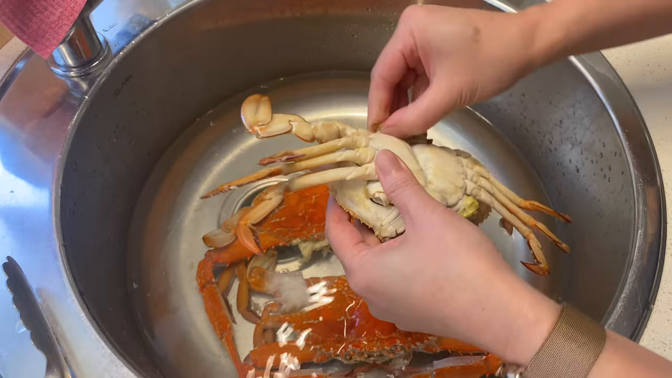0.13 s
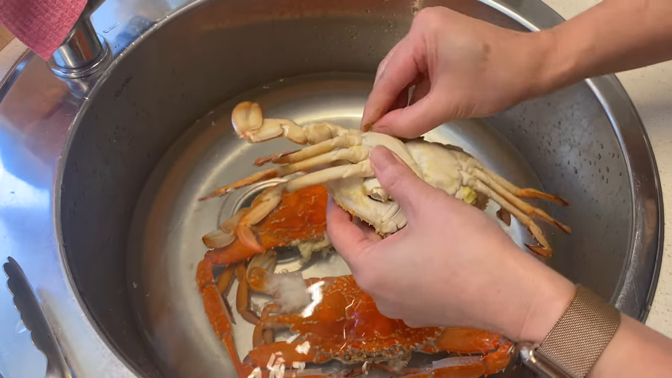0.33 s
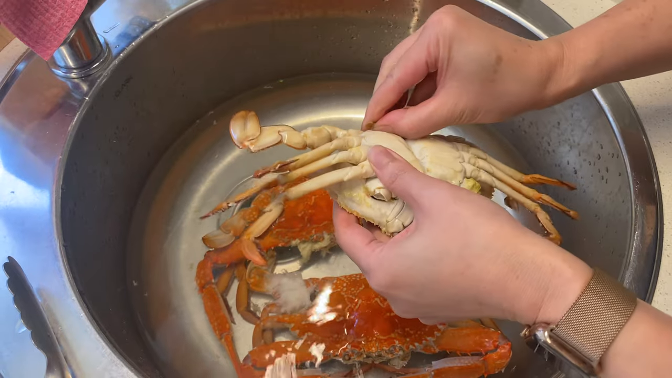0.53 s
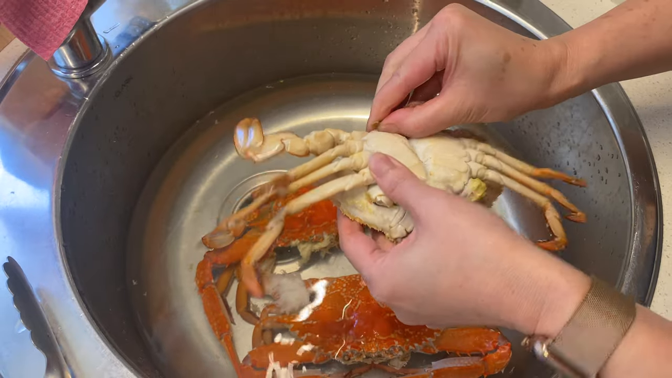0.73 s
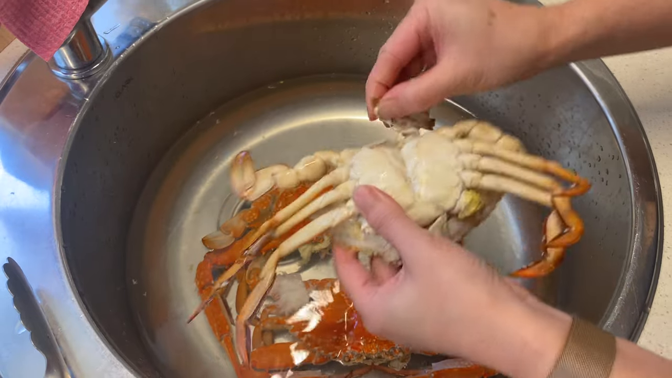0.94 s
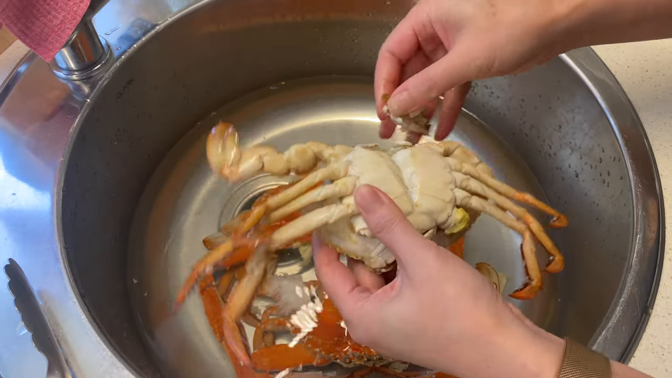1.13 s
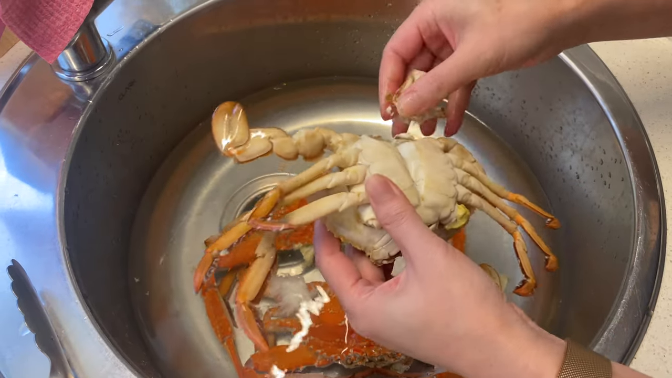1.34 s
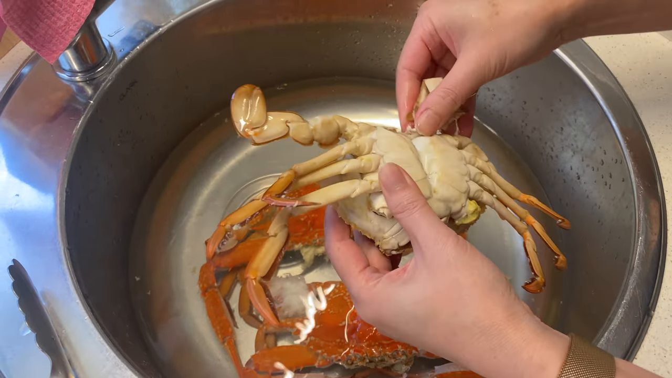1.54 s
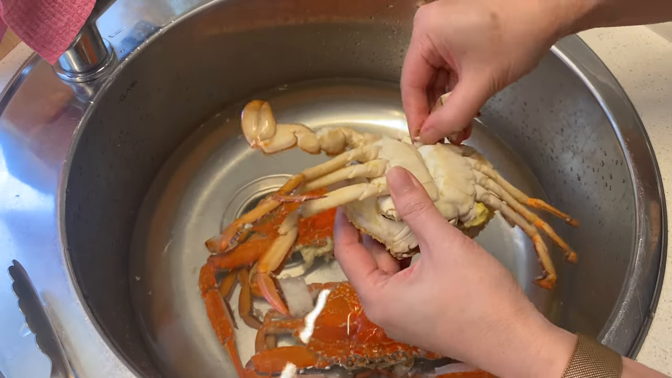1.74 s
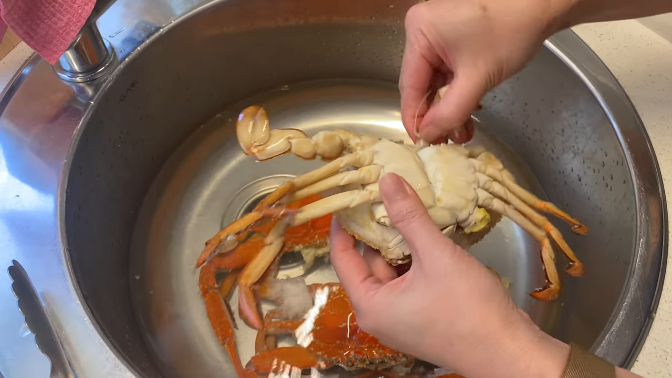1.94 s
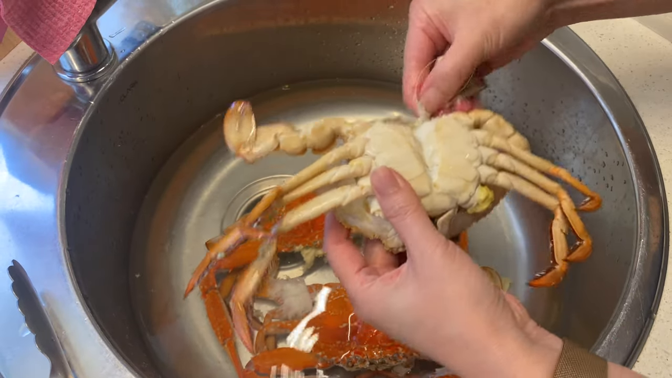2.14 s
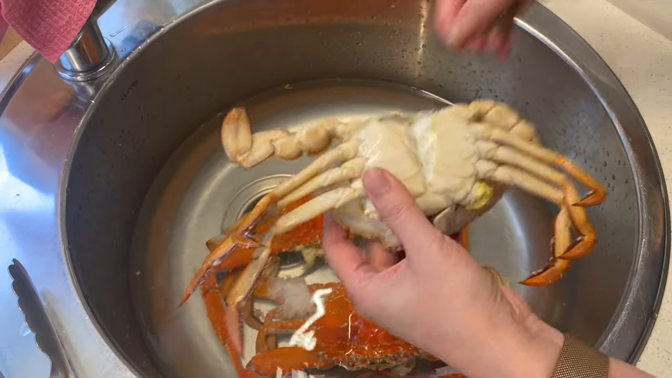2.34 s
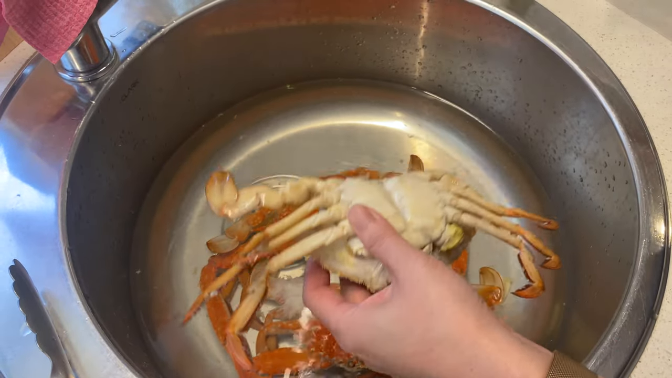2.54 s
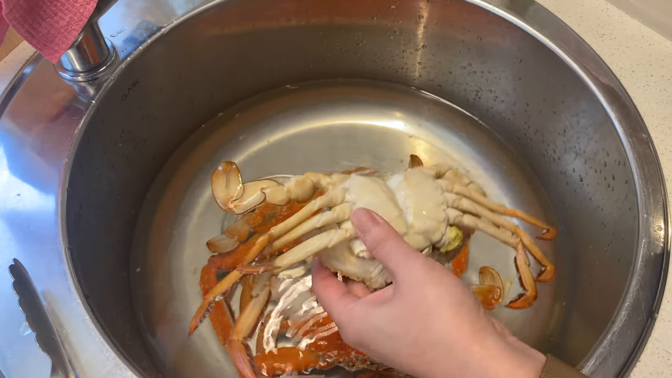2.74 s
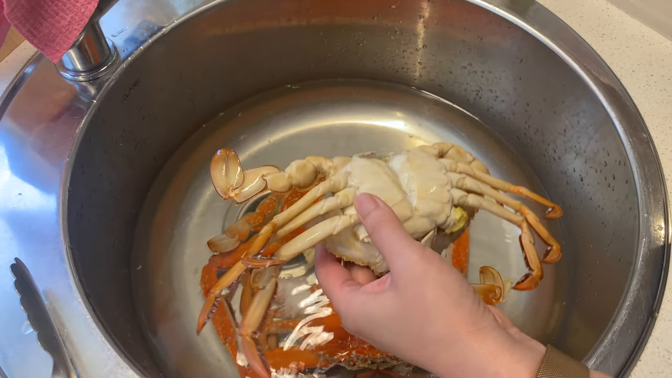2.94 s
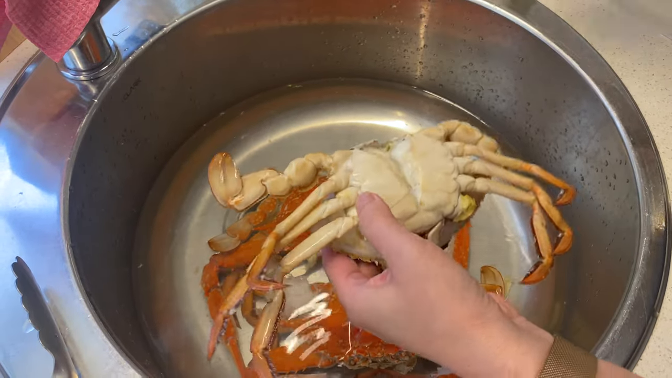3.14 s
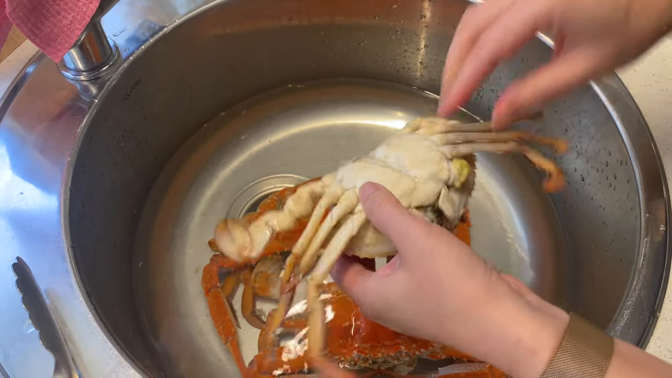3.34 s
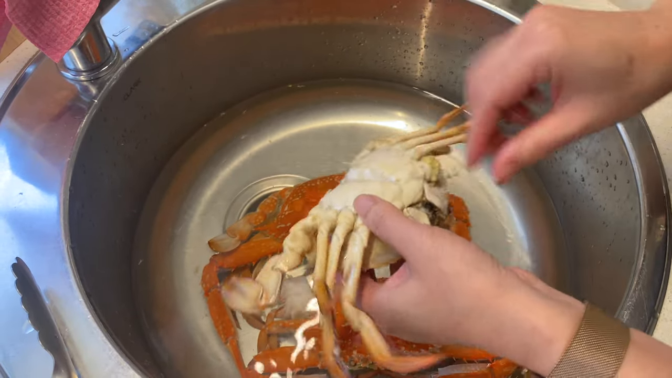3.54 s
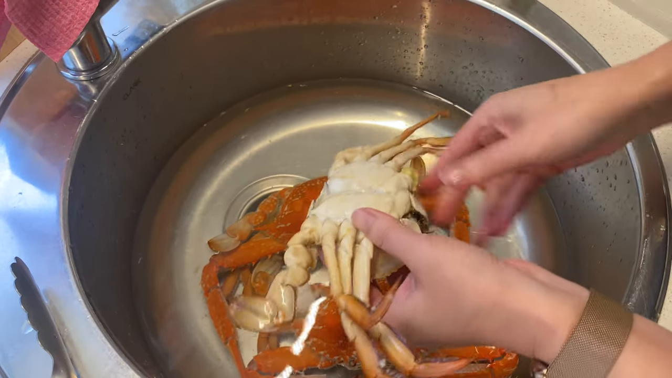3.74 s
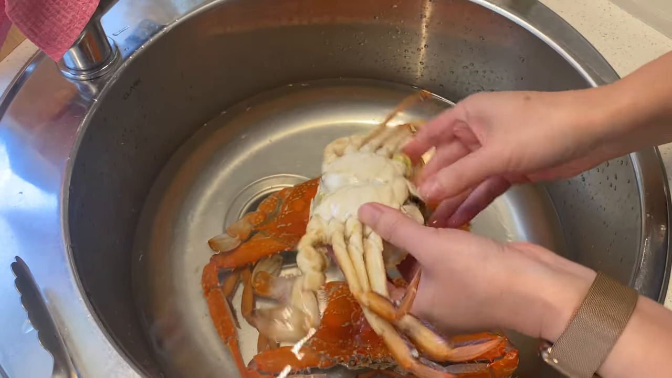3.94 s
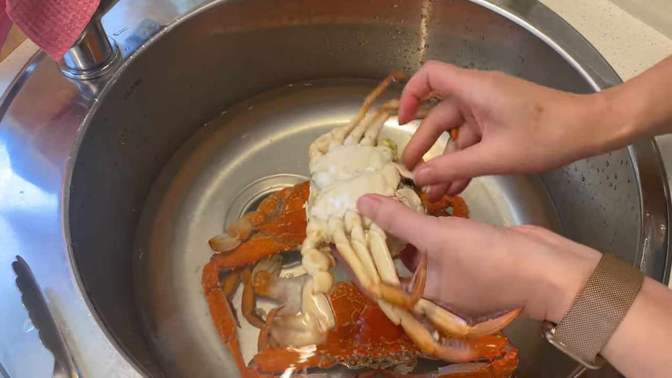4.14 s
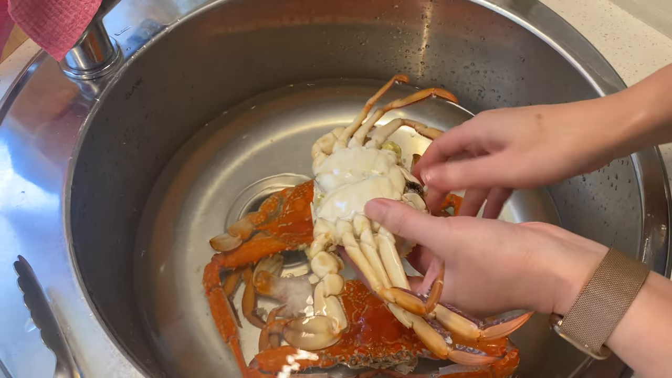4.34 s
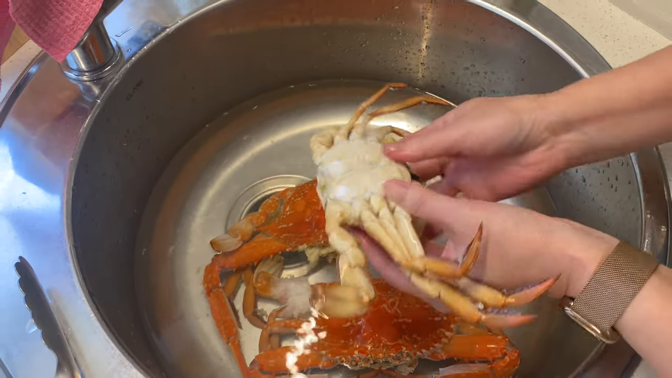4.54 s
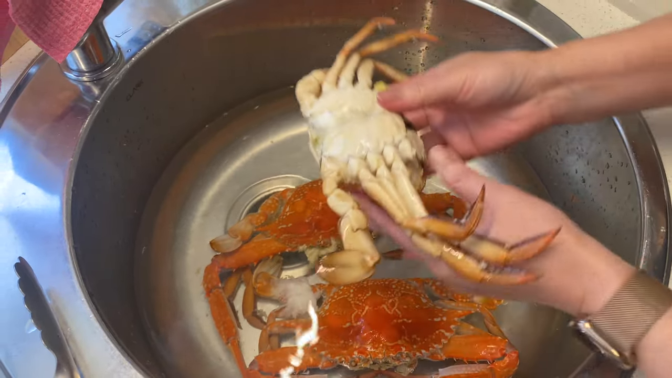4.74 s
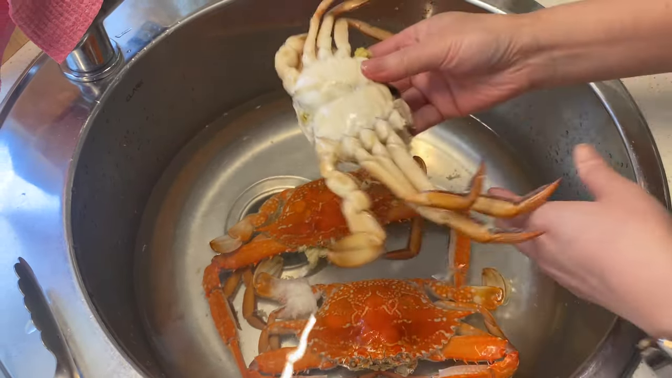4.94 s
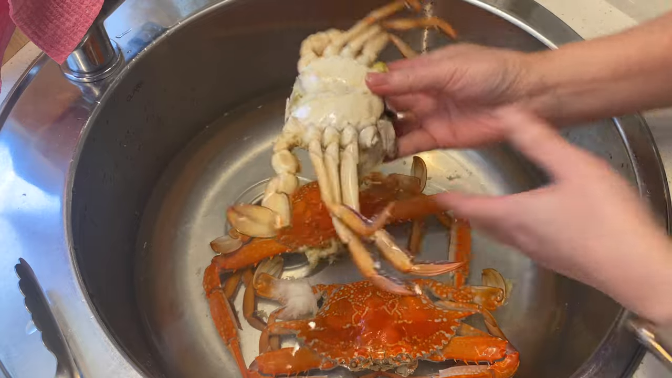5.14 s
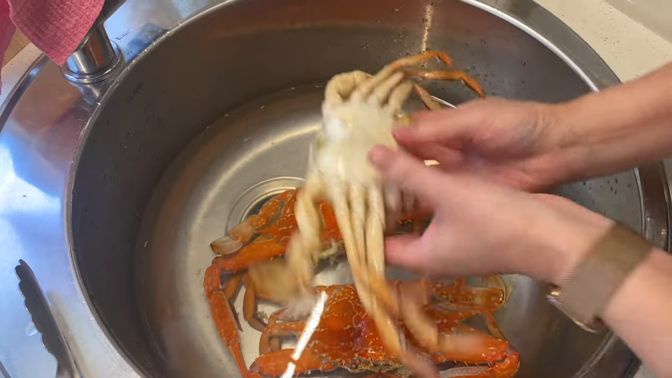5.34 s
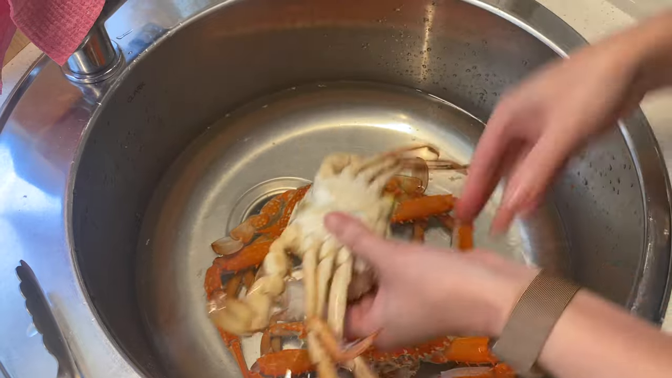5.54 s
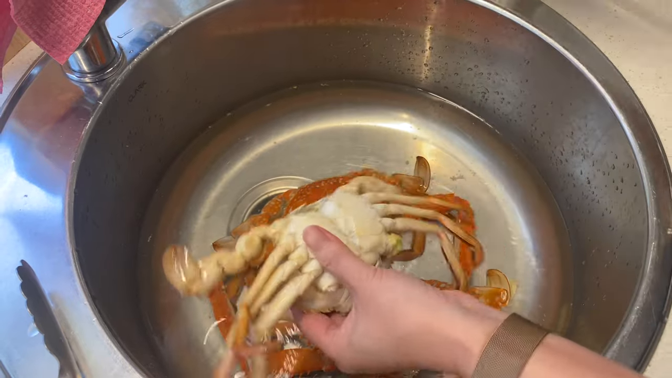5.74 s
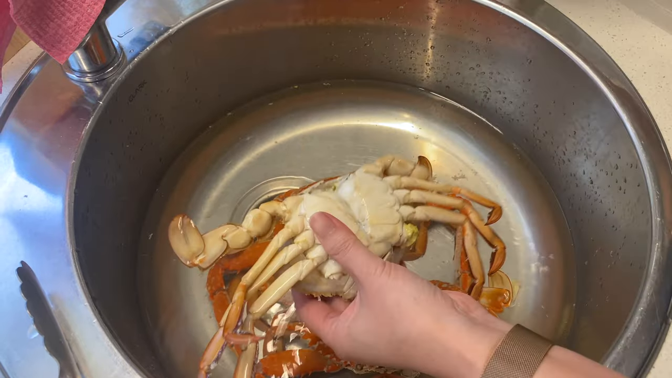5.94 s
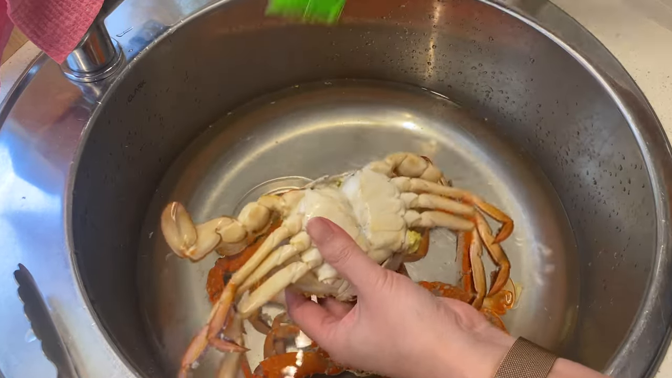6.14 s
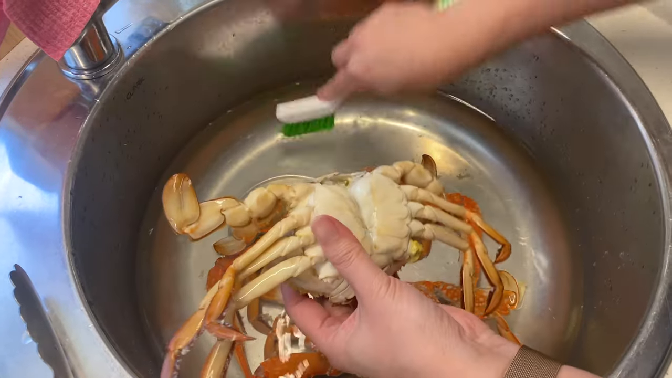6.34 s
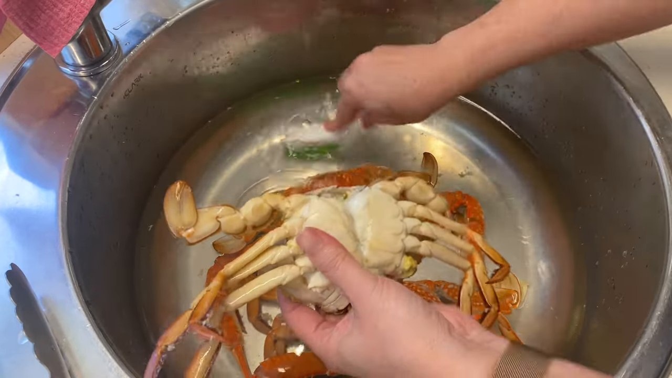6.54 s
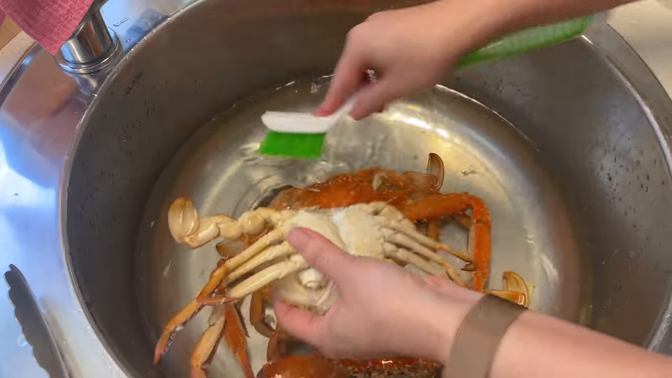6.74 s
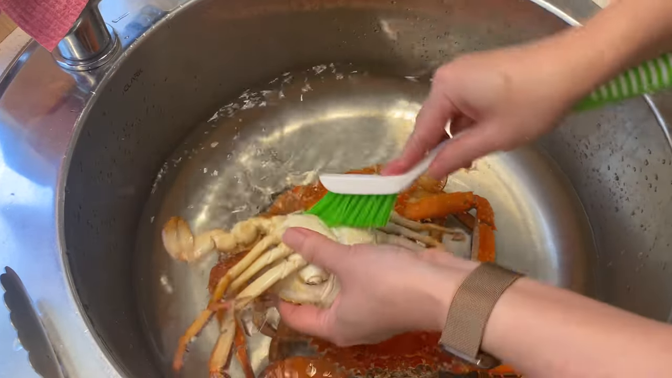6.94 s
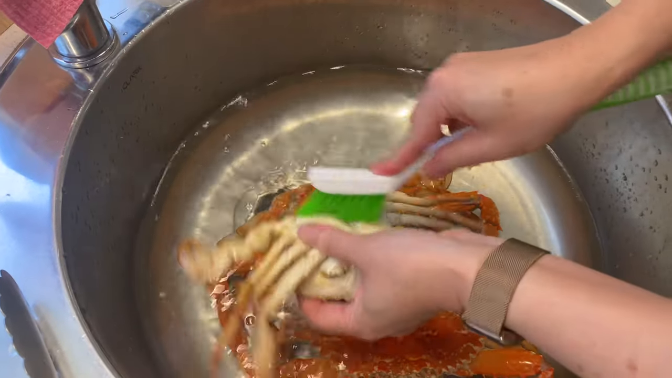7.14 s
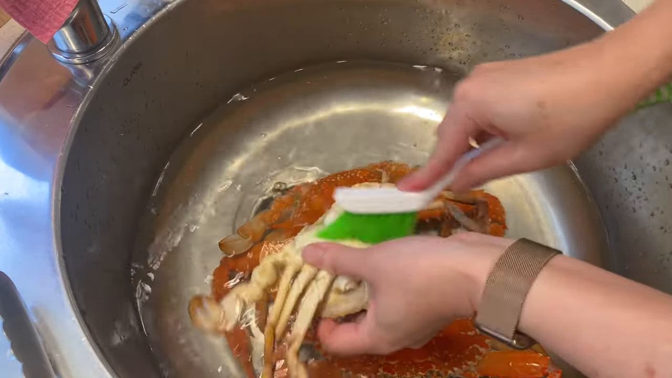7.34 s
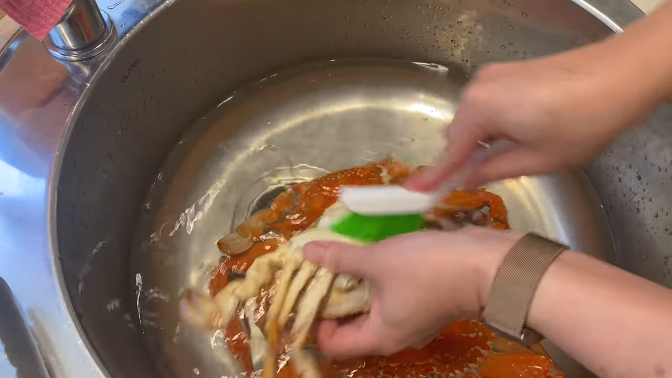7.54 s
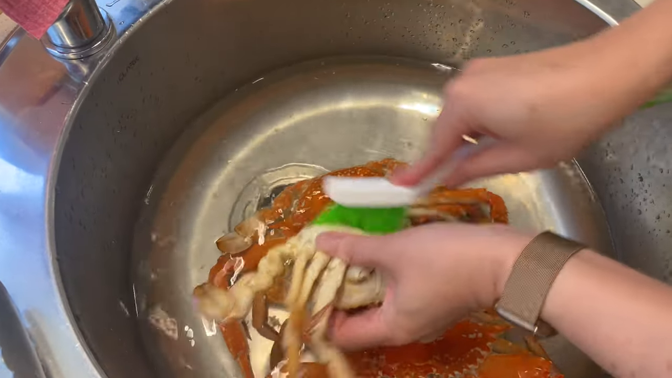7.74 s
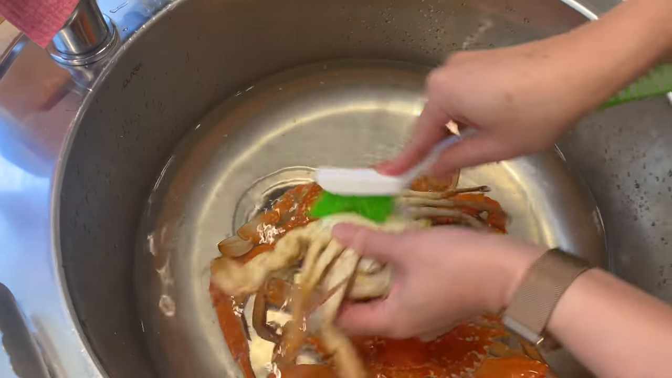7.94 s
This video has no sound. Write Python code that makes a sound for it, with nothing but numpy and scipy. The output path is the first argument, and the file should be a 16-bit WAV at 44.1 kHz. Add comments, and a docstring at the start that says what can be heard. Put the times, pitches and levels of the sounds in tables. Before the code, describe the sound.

Cooked crab shell cracks and snaps over a metal sink, a piece clatters on steel, water drips and splashes, then a brush scrubs briskly.

```python
"""An appliance hums; over it a cooked crab is cleaned in a steel sink with a little water in it.
Noise clicks make the snaps and a flap tearing off; modes ring where a piece lands on the steel.
Gliding sines make drips and gulps; grains and short bubbles make splashes and squelches.
Then a brush is plunged in and scrubs: gated grain noise makes its strokes, clicks its head.
Resonances of the basin and kitchen echoes surround everything made in the sink."""
import sys
import numpy as np
from scipy import signal
from scipy.fft import rfft, irfft, next_fast_len
from scipy.io import wavfile

SR = 44100
rng = np.random.default_rng(int(sys.argv[2]) if len(sys.argv) > 2 else 0)


def int16_out(signal):
    """Quantize to a 16-bit WAV file."""
    q = np.round(np.clip(np.atleast_2d(signal).T, -1, 1) * 32767)
    wavfile.write(sys.argv[1], SR, q.astype(np.int16))


N = 352359
TIME = np.arange(N) / SR
AGE = TIME[:int(.4 * SR)]   # time since the start of one event

# appliance hum tones: (frequency [Hz], level [dB])
HUM_TONES = [(49.5, -52.5), (99.3, -67), (197.5, -60), (216, -62), (276.5, -62), (335.7, -58.5), (375, -73),
             (493.5, -72), (610, -66), (2320, -84.5), (2417, -78.5), (3310, -80.5)]
# colour of the room's rush: (frequency [Hz], gain [dB])
AIR_COLOUR = [(24, -29.5), (40, 0.5), (65, 2.5), (125, 4), (170, -7), (300, -1.5), (450, -9.5), (750, -12),
              (1200, -25), (2000, -31.5), (3200, -28), (4700, -34), (8000, -45.5), (13500, -54),
              (16000, -64.5)]
AIR_DB = -48
# the motor's second order, with one slow swell
DRONE_HZ, DRONE_DB = 99.6, -53.5
DRONE_SWELL_DB, DRONE_SWELL_AT_S, DRONE_SWELL_S = 10.5, 5.54, 0.49

# shell snaps under the fingers: (time [s], level [dB], tilt [dB/octave])
SNAPS = [(0.113, -45, 18), (0.203, -35, 1.5), (0.4756, -38, 4.5), (1.388, -43, -4), (1.433, -45.5, -4.5),
         (1.72, -36, 13), (1.892, -24, 2), (1.9244, -24, -1), (2.1527, -29.5, -1.5), (3.895, -53, 13),
         (3.992, -54, -8), (5.329, -51, -7), (5.532, -43, -2.5), (5.795, -36.5, -4.5), (6.053, -42, 1),
         (6.321, -42, 8.5), (6.3655, -31.5, 0.5)]
# colour of a snap: (frequency [Hz], gain [dB])
SNAP_COLOUR = [(50, -17), (130, -12), (300, -2.5), (900, -4.5), (1700, -4), (3000, -0.5), (5000, 2),
               (8000, -2.5), (16000, -4)]
SNAP_DECAY_S = 0.0059
# wet fibres tear round every snap; level relative to the snap
TEAR_DB, TEAR_RISE_S, TEAR_FALL_S = -18.5, 0.013, 0.028
# fingers tug and turn the crab: (crest time [s], level [dB], rise and fall [s])
TUGS = [(0.327, -56, 0.018), (0.632, -55.5, 0.033), (0.767, -31, 0.0064), (1.78, -62, 0.3),
        (3.403, -55, 0.017), (3.943, -65, 0.026), (4.50, -68.5, 0.07), (4.804, -77, 0.054),
        (5.484, -68.5, .08), (6.017, -49, 0.062)]
# colour of the fibres' crackle: (frequency [Hz], gain [dB])
CRACKLE_COLOUR = [(300, -17.5), (1500, 1), (4000, 0.5), (8000, -6), (14000, -4.5), (16000, -0.5)]
# stray ticks in the crackle; level relative to it
TICKS_PER_S, TICK_DB = 45, -13
# the flap breaks off: (time [s], level [dB])
FLAP_CRACKS = [(0.7622, -19.5), (0.7672, -12.5), (0.7881, -10.5), (0.7987, -19), (0.802, -14.5)]
# colour of a crack: (frequency [Hz], gain [dB])
CRACK_COLOUR = [(150, -13.5), (800, -15), (1500, -12), (2000, -2.5), (2700, 0), (3300, -2.5), (3950, 11.5),
                (4700, 5), (6500, 2.5), (10000, -3.5), (16000, -6)]
# thin ring a crack leaves in the basin: (frequency [Hz], level [dB], t60 [s])
CRACK_MODES = [(3900, -4, .016), (4320, -13, .07), (4242, -28, .32), (4100, -33, .42)]
CRACK_DECAY_S, CRACK_CONTACT_DB = .004, -1   # contact level relative to the modes

# drops trap a bubble: (time [s], level [dB], bubble [Hz], splash relative to bubble [dB])
DROPS = [(0.701, -41, 2736, -20.5), (4.0631, -22.5, 1770, -7), (4.468, -47.5, 3410, -21),
         (4.6, -55, 1636, -4), (4.70, -59.5, 3220, -9), (4.90, -59, 3450, -14), (5.397, -51, 2720, -12),
         (5.8791, -29, 1555, -24), (5.883, -37, 2660, -19), (5.892, -36, 1400, -16), (5.92, -41, 1850, -11),
         (5.927, -32, 2240, -13), (5.987, -43, 4050, -3), (6.230, -38, 4000, -32),
         (6.5395, -24, 3970, -5.5), (6.549, -27, 4000, -6), (6.609, -41, 2640, -14),
         (6.630, -42, 2850, -10), (6.645, -37, 1880, -23), (6.6552, -23, 4580, -12),
         (6.655, -31.5, 2680, -7), (6.657, -36.5, 1715, -8), (6.672, -34, 2290, -17),
         (6.674, -32, 3800, -14), (6.687, -32.5, 4400, -12), (6.7423, -25, 5220, -11.5),
         (6.743, -36.5, 2400, -5), (6.8145, -44, 2870, 4.5), (7.036, -33, 1470, -4)]
# bubble life in cycles; the bowl shields the drops from the room
BUBBLE_CYCLES, DROP_ROOM_DB = 8, -4
DROP_ECHO_DELAY_S, DROP_ECHO_DB = 0.0067, -11.5

# a piece lands on steel, clatters, rattles again: (time [s], level [dB], tilt [dB/octave])
CLATTER = [(2.689, -39, 4.5), (2.7127, -16, 8), (2.7215, -21, 0), (2.7324, -16, 0.5), (2.739, -28, 1.5),
           (2.756, -24.5, 1.5), (2.7654, -29, 0.5), (2.983, -41, 0.5), (2.997, -43.5, -1), (3.014, -46, 3),
           (3.053, -48, -1.5)]
# colour of shell on steel: (frequency [Hz], gain [dB])
CLATTER_COLOUR = [(70, -26), (160, 8.5), (380, -1), (600, -8), (950, -0.5), (1450, 0), (1950, -6),
                  (2500, 4), (3300, -3), (4300, -7), (6500, -15.5), (10000, -28), (16000, -43)]
CLATTER_CONTACT_DB = -2   # relative to the modes
# ring of the sink wall: (frequency [Hz], level [dB], t60 [s])
WALL_MODES = [(867, -10, .07), (932, 0, .08), (982, -2, .05), (1027, -9, .05), (1107, -17, .16),
              (1227, -16, .09), (1410, -4, .03), (2324, -20, .2), (2448, -18, .15), (2480, -13, .11),
              (2853, -18, .3), (3210, -16, .2), (3930, -20, .18), (4323, -21, .13)]
# crab and brush bump the sink bottom: (time [s], level [dB], tilt [dB/octave])
BUMPS = [(2.153, -36.5, 1.5), (2.718, -23.5, 1), (2.758, -31.5, -4), (4.073, -52.5, -10), (5.921, -36, -8),
         (5.991, -38, -7), (6.055, -40.5, -4), (6.377, -28.5, 6), (6.3921, -19.5, 2), (6.402, -25.5, -7),
         (7.03, -55, -15), (7.63, -42.5, -12.5), (7.85, -60, -15)]
# colour of a bump: (frequency [Hz], gain [dB])
BUMP_COLOUR = [(40, -24.5), (100, 20.5), (150, 9.5), (200, 0), (280, 15), (430, 3), (560, 3), (800, 1.5),
               (1300, -8.5), (2200, -41), (8000, -51)]
# lower ring of the wet bottom: (frequency [Hz], level [dB], t60 [s])
BOTTOM_MODES = [(95.9, 4, 0.58), (198, -9, 0.46), (265.4, -12.5, 0.2), (610, -18.5, 0.34),
                (757, -21.5, 0.34), (968, -20.5, 0.28), (985, -19, 0.86), (1210, -15.5, 0.076),
                (1251, -11, 0.27)]
# the duller the bump, the more goes into the ring; ring relative to the bump
BUMP_RING_DB, RING_DB_PER_TILT = -17, -2
# lean of the bottom's sound to the right: (frequency [Hz], gain [dB])
BOTTOM_LEAN = [(90, -27.5), (260, -13.5), (550, -7), (1200, -19)]
# a leg tip taps the steel
TAP_AT_S, TAP_DB = 5.5317, -51
# ring of the tap: (frequency [Hz], level [dB], t60 [s])
TAP_MODES = [(2417, -7, .1), (3160, -1, .1), (3510, 0, .13)]

# water is stirred: (crest time [s], level [dB], rise [s], fall [s])
SPLASHES = [(5.50, -65.5, 0.036, 0.19), (6.391, -15.5, 0.0077, 0.011), (6.540, -27, 0.0075, 0.023),
            (6.575, -39, 0.02, 0.033), (6.68, -40.5, 0.054, 0.099)]
# colour of spray: (frequency [Hz], gain [dB])
SPRAY_COLOUR = [(200, 4), (700, -6.5), (1300, -0.5), (2000, -4.5), (2800, 3.5), (4100, 0), (6000, -3.5),
                (9000, -6), (16000, -15)]
# air pockets gulp as brush and crab go under: (time [s], level [dB], pitch [Hz], life [s])
GULPS = [(6.372, -32.5, 686, 0.026), (6.390, -18.5, 748, 0.011), (6.414, -33, 840, 0.025),
         (6.411, -29.5, 1200, .016), (6.438, -30, 936, 0.019), (6.464, -30, 960, 0.01),
         (6.509, -37, 967, 0.011), (6.594, -46.5, 1230, .016), (5.935, -51, 1076, 0.031),
         (5.991, -57, 940, 0.012), (6.049, -49, 620, 0.011), (6.063, -46, 710, 0.012)]
GULP_GLIDE = .03   # share by which pitch rises over one life
# slosh round the plunging brush
SLOSH_AT_S, SLOSH_DB, SLOSH_RISE_S, SLOSH_FALL_S = 6.405, -38.5, .012, .11
# colour of the slosh: (frequency [Hz], gain [dB])
SLOSH_COLOUR = [(200, -13), (500, -4), (780, -1), (1000, 0), (1120, -7), (1240, -1), (1600, -12),
                (3000, -40)]

# the crab is pressed down in the water: (crest time [s], level [dB], rise [s], fall [s])
SQUELCHES = [(5.886, -37, 0.01, 0.034), (5.931, -39, 0.017, 0.025), (5.997, -47, 0.0091, 0.018)]
# colour of a squelch: (frequency [Hz], gain [dB])
SQUELCH_COLOUR = [(300, -20), (800, -1), (1150, 6), (2000, -8), (2500, 9), (3200, -1.5), (4100, -7),
                  (5200, -9), (9000, -23), (16000, -24)]

# brush head clicks on the shell: (time [s], level [dB], tilt [dB/octave])
BRUSH_CLICKS = [(6.611, -26, 6.5), (6.867, -22.5, 1.5), (6.897, -21, 2), (6.9786, -23.5, 2.5),
                (7.0192, -32, 0.5), (7.0673, -25, 1.5), (7.2625, -24, 1), (7.397, -23.5, 8),
                (7.5145, -26, 2), (7.6273, -15.5, 3), (7.798, -28, 3), (7.8189, -27, -1),
                (7.8602, -15, 1.5), (7.9413, -17.5, 2.5)]
CLICK_DECAY_S = 0.0061
# strokes to and fro: (crest time [s], level [dB], half length [s], rasp relative to stroke [dB])
STROKES = [(6.883, -25, 0.016, -12), (7.013, -25.5, 0.024, -6), (7.11, -24.5, 0.024, -12.5),
           (7.222, -44.5, 0.019, 0.5), (7.313, -27, 0.025, -12.5), (7.413, -25.5, 0.019, -5.5),
           (7.526, -23, 0.019, -10.5), (7.638, -13.5, 0.023, -15), (7.726, -24.5, 0.02, -7),
           (7.757, -20.5, 0.015, -22), (7.848, -16, 0.024, -10), (7.877, -15, 0.01, -16.5),
           (7.917, -24.5, 0.0088, -6.5), (7.956, -27.5, 0.019, -11.5)]
# colour of bristles on shell: (frequency [Hz], gain [dB])
BRISTLE_COLOUR = [(150, -25), (400, -2), (650, -3), (900, -26), (1160, -12), (1330, -18.5), (1600, -19),
                  (2200, -14), (3300, -9), (4700, 7), (7000, 9), (10000, 1.5), (13000, 10), (16000, 2.5)]
# colour of the rasp over the shell's ridges: (frequency [Hz], gain [dB])
RIDGE_COLOUR = [(200, -16), (400, -2.5), (620, 0.5), (900, -17), (1160, -5.5), (1350, -13), (1650, -3),
                (2300, -3.5), (3300, 3.5), (4500, -0.5), (7000, -5.5), (16000, -20)]
# bristle tufts slip free at random, each with a short rasp
TUFTS_PER_S, RIDGES_PER_S, TUFT_DECAY_S = 150, 90, .0025

# air resonances of the basin: (frequency [Hz], width [Hz], gain [dB])
BASIN_MODES = [(630, 48, -3.5), (1158, 14, 1.5), (1700, 290, -7), (3365, 90, -4.5), (3813, 240, -4.5),
               (4250, 79, -2.5), (4580, 35, -7), (5470, 32, -4.5), (5810, 68, -5)]
# colour of the kitchen's echoes: (frequency [Hz], gain [dB])
ROOM_COLOUR = [(60, -35), (300, -1), (1000, -0.5), (4000, 0), (7000, -0.5), (16000, -5.5)]
# side share of diffuse sound: (frequency [Hz], gain [dB])
DIFFUSE = [(50, -35), (125, -18), (250, -15), (500, -4.5), (1000, -2.5), (16000, -14)]
# tone of the middle signal (left plus right), with a dip in the upper treble: (frequency [Hz], gain [dB])
MID_TONE = [(7200, 0), (8200, -14), (9800, -19.5), (11300, -6.5), (12800, 3)]
PORT_LAG_SAMPLES, RUMBLE_HZ, CUTOFF_HZ = 2.2, 28, 15900
# gain drops by a share of the excess over the threshold, then creeps back
DUCK_ABOVE_DB, DUCK_SHARE, DUCK_ATTACK_S, RECOVER_DB_PER_S = -20.5, 0.25, 0.036, 3.5


def from_db(db):
    """Decibels to gain."""
    return 10 ** (np.asarray(db) / 20)


def rms_one(x):
    """Scale to rms 1."""
    return x / np.sqrt(np.mean(x ** 2) + 1e-20)


def add(out, s, sound):
    """Mix a sound in at time s."""
    at = int(s * SR)
    out[:, at:at + sound.shape[-1]] += sound[..., :N - at]


def colour(x, points, tilt=0):
    """Minimum-phase filter through (Hz, dB) points, tilted in dB/octave about 1 kHz, level below 250 Hz."""
    size = 2 * next_fast_len(x.shape[-1] // 2 + 1024)
    octave = np.log2(np.clip(np.fft.rfftfreq(size, 1 / SR), 20, None) / 1000)
    hz, db = np.transpose(points)
    db = np.interp(octave, np.log2(hz / 1000), db) + tilt * np.maximum(octave, -2)
    # folding the cepstrum forward makes the phase minimum
    cepstrum = irfft(np.log(from_db(db)))
    cepstrum[1:size // 2] *= 2
    cepstrum[size // 2 + 1:] = 0
    return irfft(rfft(x, size) * np.exp(rfft(cepstrum)))[..., :x.shape[-1]]


def drift(knots_per_s):
    """Slow random wander: unit normal knots joined by straight lines."""
    knots = rng.standard_normal(N // 50)
    return np.interp(TIME * knots_per_s, np.arange(len(knots)), knots)


def stereo(pair, side_db):
    """Left and right from a mid and a side signal; the bass stays in the middle."""
    mid, side = pair
    return mid + from_db(side_db) * colour(side, DIFFUSE) * [[1], [-1]]


def contact(points, decay_s, tilt=0, edge=4.0):
    """A click scattered at once by the basin's walls; rms 1 over its first 5 ms."""
    scatter = stereo(rng.standard_normal((2, len(AGE))), side_db=1.0)
    scatter *= np.exp(-AGE / decay_s) * (1 - np.exp(-AGE / 0.001))
    scatter[:, SR // 2000] += edge   # sharp impulse at 0.5 ms
    sound = colour(scatter, points, tilt)
    return sound / np.sqrt(np.mean(sound[:, :SR // 200] ** 2))


def ringing(modes):
    """Decaying sine modes; each blow gives every mode a strength of its own."""
    hz, db, t60 = np.transpose(modes)[:, :, None]
    strength_db = db + 1.5 * rng.standard_normal(hz.shape)
    partials = from_db(strength_db - 60 * AGE / t60) * np.sin(2 * np.pi * hz * AGE)
    return np.sum(partials, axis=0) * (1 - np.exp(-AGE / 0.001))


def swells(rows):
    """Gestures (s, dB, rise s, fall s): Gaussian rise, exponential fall, added in power."""
    power = np.zeros(N)
    for s, db, rise, fall in rows:
        near = abs(TIME - s) < .5
        t = TIME[near] - s
        shape = np.exp(np.where(t < 0, -.5 * (t / rise) ** 2, -abs(t / fall)))
        power[near] += (from_db(db) * shape) ** 2
    return np.sqrt(power)


def grains(per_s, spread_db):
    """Two trains of random clicks of uneven size and sign."""
    size_db = spread_db * np.minimum(rng.exponential(1, (2, N)), 4)
    sizes = from_db(size_db) * rng.choice([-1, 1], (2, N))
    return rms_one(sizes * (rng.random((2, N)) < per_s / SR))


def bubble(hz, life_s, glide):
    """Trapped air swells into a ring, rises in pitch as it nears the surface and is gone."""
    phase = 2 * np.pi * hz * np.cumsum(1 + glide * np.minimum(AGE / life_s, 2)) / SR
    return 2 * np.sin(phase) * np.exp(-(AGE / life_s) ** 2) * (1 - np.exp(-AGE / (0.3 * life_s)))


def bubbles(low_hz, high_hz, cycles, count):
    """Short, slightly rising wet pings at random times and pitches; rms 1."""
    out, age = np.zeros((2, N)), AGE[:SR // 40]
    for when, size, pitch in rng.random((count, 3)):
        hz = low_hz * (high_hz / low_hz) ** pitch
        turns = age * hz
        ping = np.sin(2 * np.pi * turns * (1 + 0.00084 * turns)) * np.exp(-turns / cycles)
        add(out, when * TIME[-1], size ** 2 * np.sqrt(hz) * ping)
    return rms_one(out)


def motor_tone(hz):
    """Sine wavering in phase and level."""
    wave = np.sin(2 * np.pi * hz * TIME + drift(7.6))
    return np.sqrt(2) * wave * from_db(1.4 * drift(10))


def appliance():
    """Wavering motor tones over a soft rush of air."""
    hum = sum(from_db(db) * motor_tone(hz) for hz, db in HUM_TONES)
    swell = np.exp(-((TIME - DRONE_SWELL_AT_S) / DRONE_SWELL_S) ** 2)
    drone = from_db(DRONE_DB + DRONE_SWELL_DB * swell) * motor_tone(DRONE_HZ)
    air = rms_one(colour(stereo(rng.standard_normal((2, N)), side_db=6.5), AIR_COLOUR))
    return hum + drone + from_db(AIR_DB) * air


def shell():
    """The flap gives way in a quick run of cracks; fine crackle comes with every snap and tug."""
    out = np.zeros((2, N))
    for s, db, tilt in SNAPS:
        add(out, s, from_db(db) * contact(SNAP_COLOUR, SNAP_DECAY_S, tilt, edge=4.7))
    for s, db in FLAP_CRACKS:
        click = from_db(CRACK_CONTACT_DB) * contact(CRACK_COLOUR, CRACK_DECAY_S, edge=0.92)
        add(out, s, from_db(db) * (click + ringing(CRACK_MODES)))
    tears = [(s, db + TEAR_DB, TEAR_RISE_S, TEAR_FALL_S) for s, db, _ in SNAPS]
    tugs = [(s, db, length, length) for s, db, length in TUGS]
    ticks = from_db(TICK_DB) * grains(TICKS_PER_S, spread_db=1.0)
    fibres = stereo(grains(per_s=520, spread_db=2.5) + ticks, side_db=-3.5)
    return out + swells(tears + tugs) * rms_one(colour(fibres, CRACKLE_COLOUR))


def drops():
    """A tiny splash and a bubble ringing a few cycles, rising in pitch; one noisy echo off the bowl."""
    out = np.zeros((2, N))
    for s, db, hz, splash_db in DROPS:
        echo_colour = [(hz * .6, -30), (hz * .85, -7), (hz, 0),
                       (hz * 1.2, -7), (hz * 1.7, -30), (hz * 4, -60)]
        splash_colour = [(hz * .45, -24), (hz * .8, -2), (hz * 1.1, 0),
                         (hz * 2.2, -3), (hz * 4, -14), (hz * 7, -29)]
        echo = contact(echo_colour, .005)
        splash = from_db(splash_db) * contact(splash_colour, .004)
        ring = bubble(hz, BUBBLE_CYCLES / hz, glide=0.028)
        add(out, s, from_db(db) * (ring + splash))
        add(out, s + DROP_ECHO_DELAY_S, from_db(db + DROP_ECHO_DB) * echo)
    return out


def steel():
    """Hard shell sets the wall ringing, soft bumps the wet bottom, which leans to the right."""
    wall, bottom = np.zeros((2, 2, N))
    for s, db, tilt in CLATTER:
        click = from_db(CLATTER_CONTACT_DB) * contact(CLATTER_COLOUR, 0.014, tilt, edge=1.2)
        add(wall, s, from_db(db) * (click + ringing(WALL_MODES)))
    add(wall, TAP_AT_S, from_db(TAP_DB) * ringing(TAP_MODES))
    for s, db, tilt in BUMPS:
        thud = contact(BUMP_COLOUR, 0.011, tilt, edge=6.0)
        ring = from_db(BUMP_RING_DB + RING_DB_PER_TILT * tilt) * ringing(BOTTOM_MODES)
        add(bottom, s, from_db(db) * (thud + ring))
    return wall + bottom + colour(bottom, BOTTOM_LEAN) * [[-1], [1]]


def water():
    """Stirred water bursts into spatter and short bubbles; it sloshes, and large air pockets gulp."""
    spray = rms_one(colour(stereo(grains(per_s=1200, spread_db=-0.5), side_db=-2.0), SPRAY_COLOUR))
    gurgle = bubbles(low_hz=2650, high_hz=6000, cycles=9.0, count=3000)
    out = swells(SPLASHES) * (from_db(-1.5) * spray + from_db(-5) * gurgle)
    slosh = rms_one(colour(stereo(grains(per_s=300, spread_db=3.0), side_db=-7.0), SLOSH_COLOUR))
    out += swells([(SLOSH_AT_S, SLOSH_DB, SLOSH_RISE_S, SLOSH_FALL_S)]) * slosh
    for s, db, hz, life_s in GULPS:
        add(out, s, from_db(db) * bubble(hz, life_s, GULP_GLIDE))
    return out


def squelch():
    """Air and water squeezed from between the shells: clustered rough clicks and tiny pops."""
    clicks = rms_one(colour(stereo(grains(per_s=700, spread_db=-0.5), side_db=0.0), SQUELCH_COLOUR))
    pops = bubbles(low_hz=1390, high_hz=4140, cycles=6.8, count=3000)
    return swells(SQUELCHES) * (clicks + from_db(-6.5) * pops)


def catching(per_s):
    """Tufts catch and let go: random decaying releases over a constant floor; rms 1."""
    releases = rng.uniform(.4, 1, N) * (rng.random(N) < per_s / SR)
    rasps = signal.lfilter([1], [1, -np.exp(-1 / (TUFT_DECAY_S * SR))], releases)
    return rms_one(.17 + rasps)


def pressure(rows):
    """Brush pressure: Gaussian strokes (s, dB, half length s) added in power."""
    return np.sqrt(sum(from_db(2 * db) * np.exp(-((TIME - s) / length) ** 2) for s, db, length in rows))


def brush():
    """Bristles flick over wet shell, rasp over its ridges and pop wet clumps; the head clicks on it."""
    out = np.zeros((2, N))
    for s, db, tilt in BRUSH_CLICKS:
        add(out, s, from_db(db) * contact(SNAP_COLOUR, CLICK_DECAY_S, tilt, edge=2.26))
    bristles = rms_one(colour(stereo(grains(per_s=7000, spread_db=1.5), side_db=-5), BRISTLE_COLOUR))
    rasp = rms_one(colour(stereo(grains(per_s=2500, spread_db=1.5), side_db=-7), RIDGE_COLOUR))
    flicks = catching(TUFTS_PER_S) * bristles
    ridges = catching(RIDGES_PER_S) * rasp
    scratches = bubbles(low_hz=2900, high_hz=7200, cycles=6.0, count=5000)
    clumps = bubbles(low_hz=1100, high_hz=2900, cycles=3.5, count=1600)
    stroke_force = pressure([(s, db, length) for s, db, length, _ in STROKES])
    rasp_force = pressure([(s, db + rasp_db, length) for s, db, length, rasp_db in STROKES])
    out += stroke_force * (from_db(-2.5) * flicks + from_db(-12) * scratches)
    out += rasp_force * (from_db(-2) * ridges + from_db(-11) * clumps)
    return out


def basin(x):
    """The air in the bowl adds narrow two-pole resonances to every sound made in it."""
    out = x.copy()
    for hz, width_hz, db in BASIN_MODES:
        r = np.exp(-np.pi * width_hz / SR)   # pole radius
        zeros = (1 - r * r) / 2 * np.array([1, 0, -1])
        poles = [1, -2 * r * np.cos(2 * np.pi * hz / SR), r * r]
        out += from_db(db) * signal.lfilter(zeros, poles, x + 1e-18)
    return out


def kitchen(x, near_db, near_t60, far_db, far_t60):
    """Quick echoes from sink and counter, then the room's longer tail, as decaying noise."""
    response, age = 0, TIME[:SR]
    for db, t60, side_db in ((near_db, near_t60, -4), (far_db, far_t60, -1.5)):
        noise = stereo(rng.standard_normal((2, len(age))), side_db)
        tail = noise * from_db(-60 * age / t60) * (1 - np.exp(-age * 250))
        response = response + from_db(db) * rms_one(tail) / np.sqrt(len(age))
    mono = x.mean(axis=0)[None]
    return signal.fftconvolve(mono, colour(response, ROOM_COLOUR), axes=1)[:, :N]


def gain_control(x):
    """Loud peaks turn the gain down quickly; it recovers at a steady rate."""
    peak_db = 20 * np.log10(abs(x).max(axis=0) + 1e-9)
    over_db = np.maximum(peak_db - DUCK_ABOVE_DB, 0)
    # a running maximum on a rising ramp gives the linear recovery
    recovery_db = RECOVER_DB_PER_S * TIME
    duck_db = np.maximum.accumulate(DUCK_SHARE * over_db + recovery_db) - recovery_db
    r = np.exp(-1 / (DUCK_ATTACK_S * SR))
    return x * from_db(-signal.lfilter([1 - r], [1, -r], duck_db))


def scene():
    """Sink sounds pass basin and kitchen, drops with less kitchen; the appliance stands to the right."""
    handling = basin(shell() + steel() + water() + squelch() + brush())
    drips = basin(drops())
    wet = kitchen(handling + from_db(DROP_ROOM_DB) * drips,
                  near_db=-5.0, near_t60=0.22, far_db=-12.0, far_t60=0.64)
    left_right = np.array([[1], [-1]])
    sink = (handling + drips + wet) * from_db(-.3 * left_right)
    return sink + appliance() * from_db(-.7 * left_right)


def record(dry):
    """Two close ports, the right slightly later; gain ducks, peaks are rounded, rumble and top are cut."""
    hz = np.fft.rfftfreq(N, 1 / SR)
    left, right = rfft(.8 * np.tanh(gain_control(dry) / .8))
    right = right * np.exp(-2j * np.pi * hz * PORT_LAG_SAMPLES / SR)
    mid_gain = from_db(np.interp(hz, *np.transpose(MID_TONE)))
    mid = irfft((left + right) / 2 * mid_gain, N)
    side = irfft((left - right) / 2, N)
    rumble_cut = signal.butter(2, RUMBLE_HZ, "high", fs=SR, output="sos")
    top_cut = signal.ellip(10, .1, 60, CUTOFF_HZ, fs=SR, output="sos")
    ports = signal.sosfilt(rumble_cut, mid + side * [[1], [-1]])
    return signal.sosfiltfilt(top_cut, ports)


dry = scene()
out = record(dry)
int16_out(out)
```